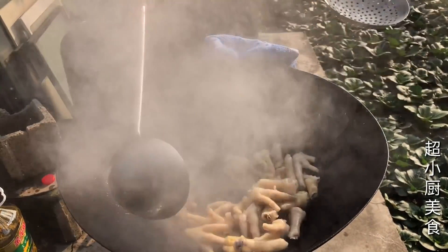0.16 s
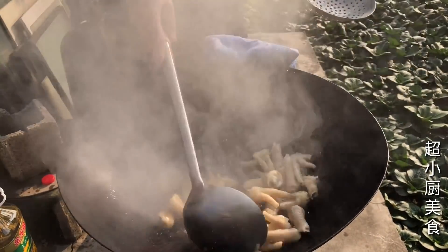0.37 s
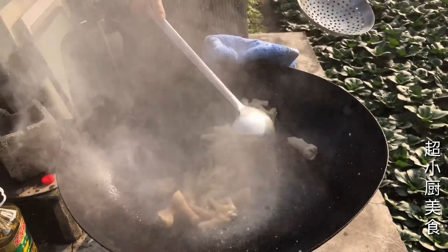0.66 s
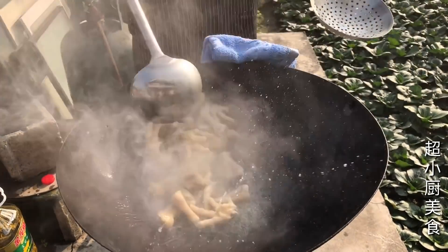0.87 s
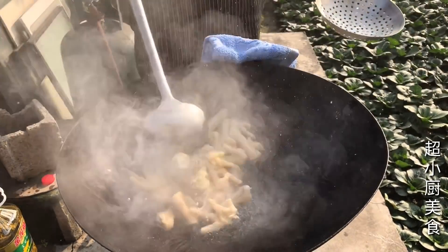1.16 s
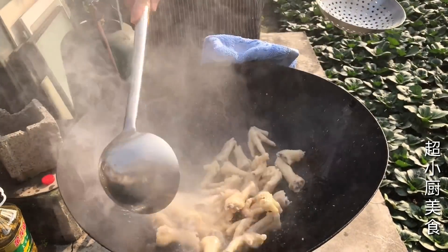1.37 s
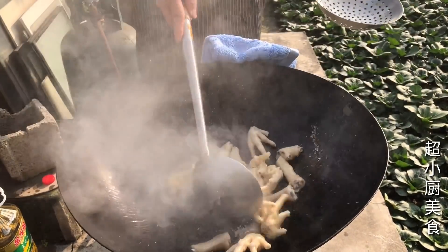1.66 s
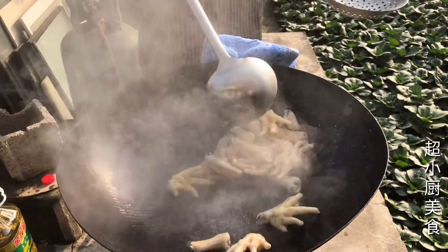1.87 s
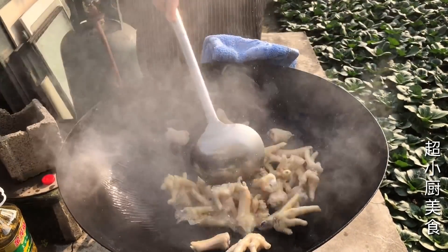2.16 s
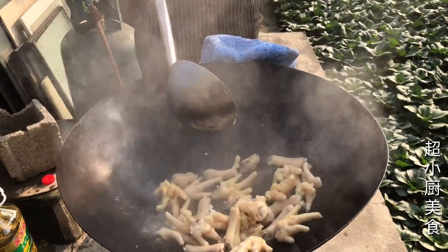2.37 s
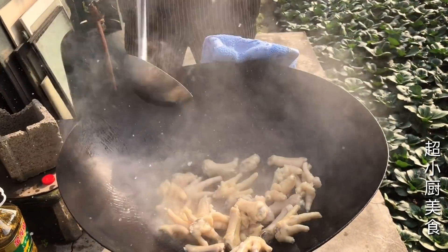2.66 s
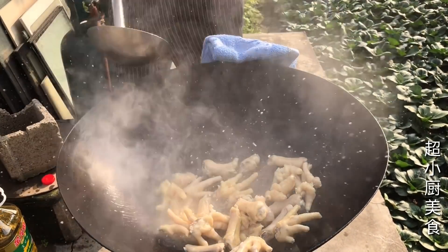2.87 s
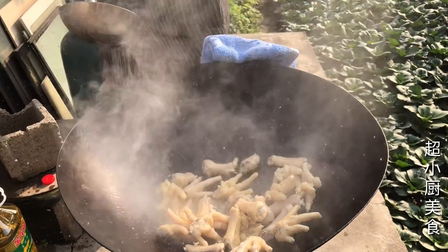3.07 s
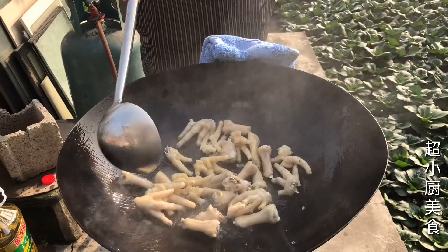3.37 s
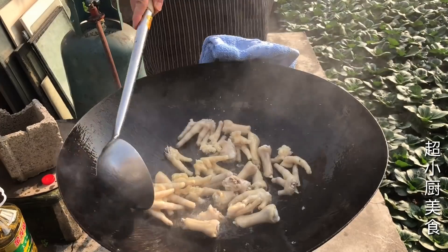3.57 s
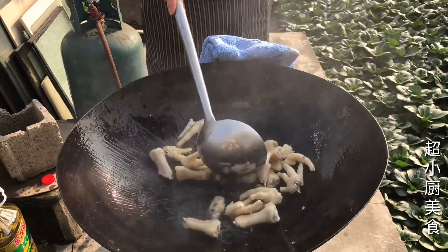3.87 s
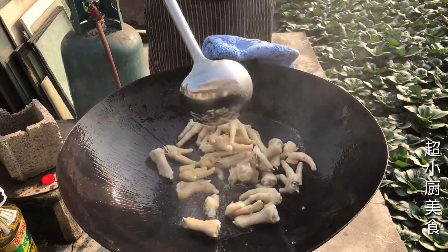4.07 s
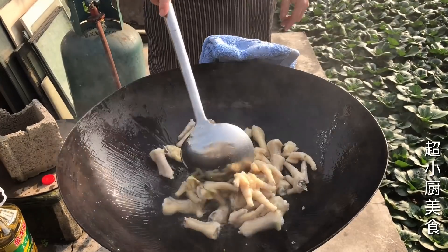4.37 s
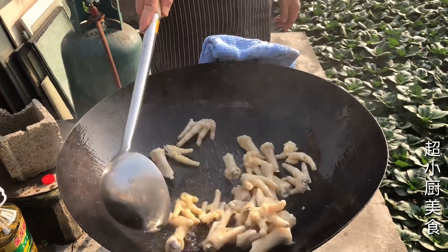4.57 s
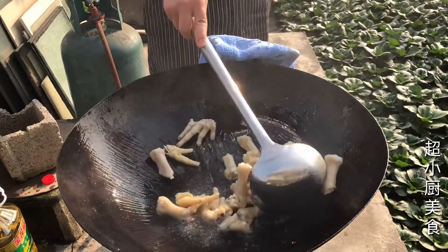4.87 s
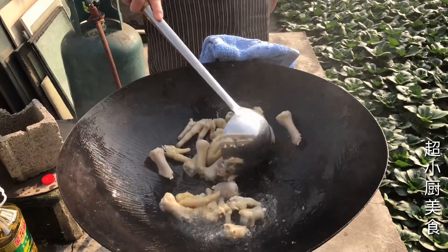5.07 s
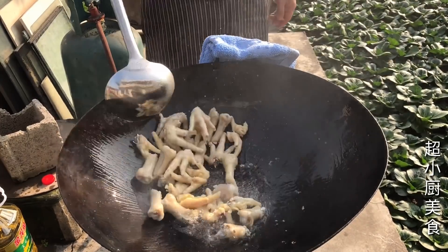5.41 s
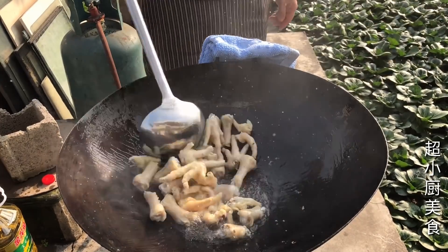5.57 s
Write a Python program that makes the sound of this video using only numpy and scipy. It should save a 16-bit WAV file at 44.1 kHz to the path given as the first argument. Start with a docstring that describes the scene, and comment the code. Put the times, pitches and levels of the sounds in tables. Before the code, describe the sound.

Wet chicken feet sizzle loudly in hot oil in a big steel wok outdoors, with popping bursts snapping against the thin metal. After about a second the pops crowd together as a ladle turns the food, knocking, scraping and briefly squeaking. Past the middle, the hardest spits of oil crack right at the close microphone. The sizzle then sinks, and builds again toward a last scrape and two knocks.

```python
"""Wet chicken feet fry outdoors in a big steel wok, tiny steam bubbles fizzing in the oil throughout.
From the start, bigger bursts snap against the thin steel, which spreads each into a falling chirp.
Around 1 s they crowd together as a ladle starts turning the food, knocking, scraping and squeaking.
Near 3.5 s the hardest spits of oil overload the close microphone, and then the sizzle sinks.
It builds again towards a last scrape and two knocks after 5 s."""
import sys
import numpy as np
from scipy import signal
from scipy.fft import rfft, irfft, next_fast_len
from scipy.io import wavfile
from scipy.ndimage import uniform_filter1d, minimum_filter1d, map_coordinates

SR = 44100
rng = np.random.default_rng(int(sys.argv[2]) if len(sys.argv) > 2 else 0)


def bounce(signal):
    """Save signal as a 16-bit WAV file at the path given by the first command-line argument."""
    frames = np.transpose(np.atleast_2d(signal))
    limited = np.clip(frames, -1, 1)
    pcm = np.round(limited * 32767).astype(np.int16)
    wavfile.write(sys.argv[1], SR, pcm)


N = 253127

# Fader rides for the fine fizz of the wet food: (time [s], fizz level [dB], treble level [dB])
FIZZ_RIDE = [(0.0, -23, -22.5), (0.4, -18, -17.5), (1.04, -16.0, -13), (1.12, -12.5, -15),
             (1.28, -18, -18.0), (1.6, -12.5, -10.5), (1.84, -16, -14.5), (2.32, -19, -17.5),
             (2.4, -15.5, -17), (2.64, -14, -14.5), (2.8, -17.5, -14), (3.12, -18.0, -18.5),
             (3.2, -17, -15), (3.52, -17.5, -19), (3.68, -27, -28.5), (3.84, -22.5, -23.0),
             (3.92, -31.5, -24), (4.0, -21, -23), (4.4, -21.0, -32), (4.56, -20, -17), (4.8, -18.0, -21),
             (5.2, -18, -12.5), (5.28, -18.5, -19.5), (5.74, -16, -15)]
# Fader ride for the coarse sizzle of the larger bubbles: (time [s], level [dB])
SIZZLE_RIDE = [(0.0, -19.5), (0.48, -14), (1.28, -16.0), (1.36, -15), (1.44, -18), (1.76, -11),
               (1.92, -17.5), (2.16, -14), (2.32, -17), (2.64, -13.5), (2.8, -16.5), (3.52, -14.5),
               (3.68, -21), (4.0, -20.5), (4.4, -16.0), (4.64, -23), (4.72, -16.5), (4.96, -15.5),
               (5.04, -16.5), (5.2, -12), (5.28, -17), (5.74, -13)]
# Airy EQ of the tiny bubbles: (frequency [Hz], level [dB])
FIZZ_EQ = [(1500, -27), (3200, -7.5), (4800, 0), (7500, -1), (9800, -4.5), (12000, -3), (14500, -2.5)]
# Biting EQ of the larger bubbles: (frequency [Hz], level [dB])
SIZZLE_EQ = [(900, -23), (2000, -12), (2400, -6.5), (2750, 0.5), (3100, 2), (3600, -0.5), (4200, -3),
             (5200, -14), (8000, -14), (14000, -15.5)]
FIZZ_TRIM_DB, SIZZLE_TRIM_DB = 6.0, 1.4
def frying(fizz_db, treble_db, sizzle_db):
    """Tiny steam bubbles fizz and larger ones ring near 3 kHz; both come in quick flurries."""
    flurry_db = 0.36 * wobble(38) + 0.55 * wobble(170) + 1.9 * wobble(800)
    tiny = bursts(rate=6500, spread_db=5.5) + amp(-1.0) * rng.standard_normal(N)
    large = bursts(rate=3000, spread_db=4.0) + amp(-0.5) * rng.standard_normal(N) + 0.16 * tiny
    fizz = patchy(coloured(tiny, FIZZ_EQ), depth_db=1.8)
    # the very smallest bubbles surge on their own in the treble
    top = signal.sosfiltfilt(signal.butter(2, 9000, "high", fs=SR, output="sos"), fizz)
    top_db = treble_db - fizz_db + 0.3 * wobble(19) + 0.85 * wobble(420)
    fizz = fizz - top + amp(top_db) * top
    fizz = unit(fizz * amp(flurry_db + 0.42 * wobble(110)))
    sizzle = patchy(coloured(large, SIZZLE_EQ), depth_db=1.5)
    sizzle = unit(sizzle * amp(flurry_db + 1.3 * wobble(45)))
    return amp(fizz_db + FIZZ_TRIM_DB) * fizz + amp(sizzle_db + SIZZLE_TRIM_DB) * sizzle


# Cues for the big steam bursts on the steel: (time [s], relative level [dB], bass [dB])
SNAP_CUES = [(.09, -10, -12), (.231, -7, 1), (.373, -11.5, -11), (0.533, -8, 5), (.586, -10, -5),
             (.6, -8, -3), (.653, -9.5, 8), (0.759, -8, 2), (0.888, -1.5, -2), (0.9336, -5.5, 1),
             (0.9882, -0.5, 8), (1.007, -4, 3), (1.2258, -0.5, -3), (1.244, -8, -5), (1.2575, -3, -2),
             (1.2728, 0, 0.5), (1.338, -5.5, 3), (1.365, -2, 3), (1.452, -4, -1), (1.487, -8, 0),
             (1.555, -3, 0), (1.628, -6.5, 2.5), (1.814, -5.5, 8), (2.119, -9, 0), (2.204, 5, -6),
             (2.6401, -1, 4), (2.687, -8.5, -1), (2.8602, -2, 2.5), (2.929, -5.5, 2), (2.981, -5.5, -4),
             (3.095, -8.5, 1), (3.1106, -4.5, -4), (3.153, -6, 5), (3.2221, -3, 4), (3.283, -8, 1),
             (3.5474, -3, 4.5), (3.5632, -0.5, -3), (3.7297, -9, 3), (3.82, -7, 1), (3.877, -10.5, -5),
             (3.912, -7.5, -3), (3.946, -6.5, -5), (3.9636, -0.5, -1), (3.99, -12, 0), (4.326, -13, -7),
             (4.411, -13, -7), (4.513, -11.5, -24), (4.580, -4.5, -11), (4.604, -5.5, -16),
             (4.75, -9.5, -16), (5.303, -10.5, -12), (5.544, -6, -9), (5.593, -2, -1), (5.611, -5, -1),
             (5.662, -6, 2)]
TRAVEL_MS, TRAVEL_MS_PER_DB = 3.3, 0.22  # delay at 1 kHz of a 0 dB burst, and its growth with level
BRIGHT_DB, DARKENING, THINNING = -6.5, 0.98, 0.4  # base treble; dB lost per dB of level, per dB of bass
SMALL_SNAP_DB, SMALL_BASS_DB, SNAP_SCATTER_DB, CLUSTER_S = -18, -0.5, 1.5, 0.025
def steam_snaps():
    """Trapped water flashes to steam against the wok: a falling chirp, longer and darker if bigger."""
    track = np.zeros(N)
    # each big burst has a lesser one just before or after it
    chance = rng.standard_normal((len(SNAP_CUES), 2))
    small = [(s + CLUSTER_S * when, SMALL_SNAP_DB + SNAP_SCATTER_DB * size, SMALL_BASS_DB)
             for (s, _, _), (when, size) in zip(SNAP_CUES, chance)]
    for s, db, bass_db in list(SNAP_CUES) + small:
        bright_db = min(BRIGHT_DB - DARKENING * db, 0) - THINNING * bass_db
        eq = [(40, -36), (130, bass_db - 12), (240, bass_db - 5), (380, bass_db + 1.5),
              (620, bass_db / 3 - 1), (1100, 2),
              (1700, bright_db), (3000, bright_db - 6), (6000, bright_db - 18), (15000, bright_db - 32)]
        add(track, s, amp(db + 28.5) * bending_wave(eq, TRAVEL_MS + TRAVEL_MS_PER_DB * db))
    return track


# Cues for the sharpest spits of oil: (time [s], peak level [dB])
SPIT_CUES = [(1.409, 6), (1.816, 17), (1.942, 12.5), (2.1955, 14.5), (3.411, 12), (3.482, 14),
             (3.553, 20.5), (3.5654, 11), (3.621, 23.5), (3.639, 12), (3.7319, 14), (3.836, 17), (3.86, 12),
             (4.556, 12.5), (5.479, 20), (5.491, 8)]
SMALL_SPITS_PER_S, SMALL_SPIT_DB = 5, -4.5
def oil_spits(fizz_db):
    """Drops of water explode at the surface of the oil: a very short, bright crack."""
    track, t = np.zeros(N), np.arange(SR // 50) / SR
    # lesser spits fill in at random, softer where the fizz is low
    starts = rng.integers(N, size=int(SMALL_SPITS_PER_S * N / SR))
    scatter_db = -5.5 * rng.uniform(-0.62, 1, len(starts))
    small_db = SMALL_SPIT_DB + 0.5 * (fizz_db[starts] - np.median(fizz_db)) + scatter_db
    for s, db in list(SPIT_CUES) + list(zip(starts / SR, small_db)):
        puff = rng.standard_normal(len(t)) * amp(-60 * t / 0.0014)
        crack = coloured(puff, [(200, -9), (1200, -3.5), (3100, 6.5), (6000, -5.5), (15000, -8.0)])
        add(track, s, amp(db) * crack / np.abs(crack).max())
    return track


# The steel wok's ringing modes: (frequency [Hz], level [dB], time to fall 60 dB [s])
WOK_MODES = [(147, -4, 0.23), (174, -17, 0.38), (411.4, -2, 0.3), (442, 1, 0.19), (638, -0.5, 0.09),
             (976, -11.5, 0.2), (1067, 2, 0.056), (1290, -8, 0.046), (1630, -5, 0.066), (1543, -2, .08),
             (1750, -21, .07), (2340, -6, 0.082), (2330, 14.5, 0.0077), (2965, 5, 0.086), (4690, 1, 0.043)]
def wok_ring(centre_hz, octaves):
    """The wok's modes ring in a fresh balance, weighted towards the pitch that the contact favours."""
    t = np.arange(SR // 3) / SR
    hz, db, t60 = np.transpose(WOK_MODES)[:, :, None]
    favoured = 1 / (1 + (np.log2(hz / centre_hz) / octaves) ** 4)
    weight = favoured * amp(db + 2 * rng.standard_normal(hz.shape))
    partials = np.sin(2 * np.pi * (hz * t + rng.random(hz.shape)))
    attack = 1 - np.exp(-t / 0.001)
    ring = attack * np.sum(weight * amp(-60 * t / t60) * partials, axis=0)
    return ring / np.abs(ring).max()


# Ladle hits on the wok: (time [s], peak level [dB], tone centre [Hz])
KNOCK_CUES = [(.991, -15, 350), (1.341, -4, 1590), (2.207, -7.5, 950), (3.951, -4.5, 1670),
              (3.967, -5.5, 1450), (5.594, -10, 850), (5.664, -9, 735)]
# Ladle slides over the steel: (midpoint [s], length [s], relative level [dB], tone centre [Hz])
SCRAPE_CUES = [(.78, 0.17, -40, 151), (1.334, 0.075, -18, 1830), (1.38, 0.093, -30, 160),
               (1.767, .12, -24.5, 850), (1.776, .12, -37, 147), (2.155, .08, -24, 2250),
               (2.25, 0.15, -32, 175), (3.37, .24, -20.5, 2460), (5.08, .62, -34.5, 162),
               (5.144, 0.086, -19, 3050), (5.196, 0.14, -19, 4500), (5.67, 0.15, -29, 170)]
def ladle():
    """The ladle knocks on the food-damped wok and judders as it slides."""
    track = np.zeros(N)
    for s, db, hz in KNOCK_CUES:
        add(track, s, amp(db) * wok_ring(hz, octaves=0.73))
    for s, length, db, hz in SCRAPE_CUES:
        swell = np.hanning(int(length * SR))
        slips = bursts(rate=420, spread_db=11.0)[:2 * SR]
        rub = unit(signal.fftconvolve(slips, wok_ring(hz, octaves=0.45), "valid")[:len(swell)])
        grit_eq = [(hz / 2, -30), (hz, 0), (hz * 2, -30), (hz * 8, -70)]
        grit = unit(coloured(slips, grit_eq)[-len(swell):])
        add(track, s - length / 2, amp(db) * swell * (0.92 * rub + 1.4 * grit))
    return track


# Squeaks of the ladle's edge: (midpoint [s], relative level [dB], pitch [Hz])
SQUEAK_CUES = [(1.41, -7, 2700), (2.107, -12.5, 1660), (2.174, -12, 2245), (3.297, -16, 2030),
               (4.997, -10, 2140)]
def ladle_squeaks(length_s=0.033):
    """The ladle's edge sticks and slips for an instant: a short, rough, slightly rising squeak."""
    track, swell = np.zeros(N), np.hanning(int(length_s * SR))
    for s, db, hz in SQUEAK_CUES:
        judder = 0.06 * wobble(900)[:len(swell)]
        pitch = hz * (1 + 0.033 * np.linspace(-1, 1, len(swell)) + judder)
        grip = swell * amp(3 * wobble(450)[:len(swell)] - 1)
        add(track, s - length_s / 2, amp(db) * grip * np.sin(2 * np.pi * np.cumsum(pitch) / SR))
    return track


# Fader ride for water crackling on the steel, lower where the food dries: (time [s], level [dB])
CRACKLE_RIDE = [(0.0, -23.5), (1.39, -22), (1.73, -27.5), (2.35, -22), (2.88, -24.5), (3.07, -24),
                (3.53, -24), (3.66, -29.5), (4.25, -33.5), (4.65, -27), (5.5, -28.5), (5.74, -21)]
# Mid-forward EQ of each tick: (frequency [Hz], level [dB])
TICK_EQ = [(100, -18.5), (250, -6), (380, -2), (580, -4), (1000, 0), (1400, 1), (2000, 4), (2700, 0),
           (4000, -3), (9000, -14)]
def crackle(trim_db=4):
    """A bed of small bursts on the hot steel, near and far from the rim."""
    level_db, = curves(CRACKLE_RIDE)
    paths = [signal.fftconvolve(bursts(rate=300, spread_db=3.0), bending_wave(TICK_EQ, travel_ms))[:N]
             for travel_ms in (1.3, 2.1, 2.8)]
    return amp(level_db + trim_db) * unit(sum(paths))


# Fader ride for the wok's low drone under the stirring: (time [s], level [dB])
DRONE_RIDE = [(0.0, -22), (0.25, -52), (0.51, -50), (1.21, -29), (1.87, -35.5), (3.39, -30), (4.08, -28.5),
              (5.74, -26)]
# Hollow EQ of the wok's body: (frequency [Hz], level [dB])
BODY_EQ = [(70, -15), (120, -19), (160, -8), (225, -6), (280, 6.5), (380, 11.5), (490, -6.5), (610, 11),
           (900, -8), (2000, -16)]
# Bass-heavy EQ of the stove's rumble: (frequency [Hz], level [dB])
STOVE_EQ = [(15, -16), (30, -19), (50, -21), (68, 10), (100, -6), (160, 5), (400, -10), (1500, -54)]
def wok_drone(trim_db=-0.5):
    """Boiling and tumbling food keep the wok's low modes sounding over the stove's steady rumble."""
    level_db, = curves(DRONE_RIDE)
    thrum = unit(coloured(rng.standard_normal(N), BODY_EQ))
    modes = unit(signal.fftconvolve(rng.standard_normal(N), wok_ring(440, octaves=0.88))[:N])
    body = 0.57 * thrum + 0.21 * modes * amp(6.6 * wobble(12))
    rumble = unit(coloured(rng.standard_normal(N), STOVE_EQ))
    return amp(level_db + trim_db) * body + amp(-45.0) * rumble


def bending_wave(eq, travel_ms, size=2048):
    """A snap carried by thin steel: speed grows as the root of frequency, so the treble arrives first."""
    hz = np.fft.rfftfreq(size, 1 / SR)
    lag = 4 * np.pi * travel_ms * np.sqrt(hz / 1000)
    return irfft(eq_gain(eq, hz) * np.exp(1j * (rng.uniform(0, 2 * np.pi) - lag)))


def bursts(rate, spread_db):
    """Random clicks, about rate a second: many small, a few large."""
    happens = rng.random(N) < rate / SR
    sizes = amp(spread_db * np.minimum(rng.standard_normal(N), 2.6))
    return unit(happens * sizes * rng.choice([-1, 1], N))


def patchy(x, depth_db):
    """Bubbles of like size come in clusters, so the colour shifts from moment to moment."""
    spectra = signal.stft(x, nperseg=1024)[2]
    patches = uniform_filter1d(rng.standard_normal(spectra.shape), size=5, axis=0)  # across pitch
    patches = uniform_filter1d(patches, size=4, axis=1)  # across time
    return signal.istft(spectra * amp(depth_db * unit(patches)), nperseg=1024)[1][:N]


def coloured(x, eq, size=4096):
    """Minimum-phase EQ: nothing rings ahead of an attack."""
    cepstrum = irfft(np.log(eq_gain(eq, np.fft.rfftfreq(size, 1 / SR))))
    cepstrum[1:size // 2] *= 2
    cepstrum[size // 2 + 1:] = 0
    return signal.fftconvolve(x, irfft(np.exp(rfft(cepstrum))))[:len(x)]


def eq_gain(eq, hz):
    """Gain of an EQ curve, read on a log frequency axis."""
    points_hz, db = np.transpose(eq)
    return amp(np.interp(np.log(hz + 1), np.log(points_hz + 1), db))


def curves(ride):
    """One value per sample for each column after the time."""
    s, *columns = np.transpose(ride)
    return [np.interp(np.arange(N) / SR, s, column) for column in columns]


def wobble(rate):
    """A smooth random curve with rate knots a second."""
    return map_coordinates(rng.standard_normal(int(N * rate / SR) + 4), [np.arange(N) * rate / SR])


def amp(db):
    """Decibels to gain."""
    return 10 ** (np.asarray(db) / 20)


def unit(x):
    """Scale to rms 1."""
    return x / np.sqrt(np.mean(x ** 2) + 1e-20)


def add(track, s, sound):
    """Mix a sound into the track from time s."""
    start = max(0, round(s * SR))
    slot = track[start:start + len(sound)]
    slot += sound[:len(slot)]


def scene():
    """The mono mix: a frying bed with ladle, snaps and spits on top."""
    fizz_db, treble_db, sizzle_db = curves(FIZZ_RIDE) + curves(SIZZLE_RIDE)
    bed = frying(fizz_db, treble_db, sizzle_db) + crackle() + wok_drone()
    return (bed + ladle() + ladle_squeaks() + steam_snaps() + oil_spits(fizz_db))[None]


def limiter(x, ceiling, hold_s):
    """A peak over the ceiling pulls the gain down for a moment after it."""
    half = int(hold_s * SR / 2)
    needed = ceiling / np.maximum(np.abs(x), ceiling)
    held = minimum_filter1d(needed, 2 * half + 1, origin=half)
    ramp = np.ones(SR // 500)  # 2 ms attack and release
    return x * (1 - signal.lfilter(ramp / len(ramp), 1, 1 - held))


HIGH_CUT_HZ = 15900
def record(dry):
    """The close microphone overloads: fast limiting, soft clipping, then a steep high cut."""
    limited = limiter(dry, ceiling=2, hold_s=0.0085)
    clipped = limited / (1 + np.abs(limited) ** 8) ** (1 / 8)
    size = next_fast_len(N + SR // 10)
    passband = np.fft.rfftfreq(size, 1 / SR) < HIGH_CUT_HZ
    return irfft(rfft(clipped, size) * passband, size)[:, :N]


dry = scene()
out = record(dry)
bounce(out)
```